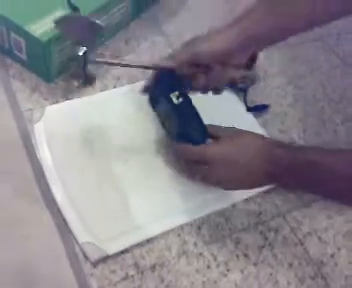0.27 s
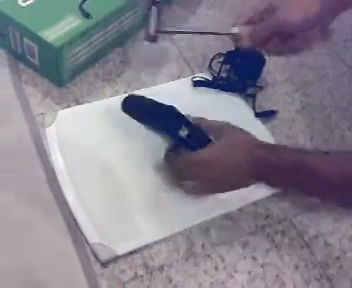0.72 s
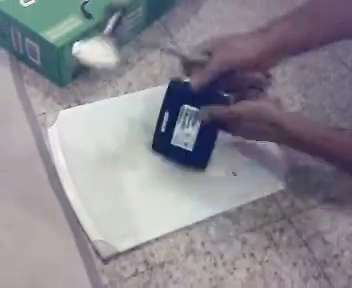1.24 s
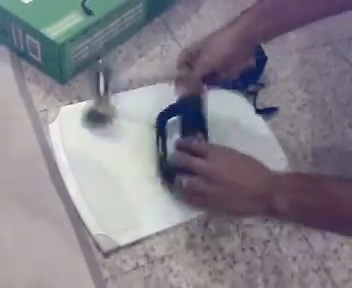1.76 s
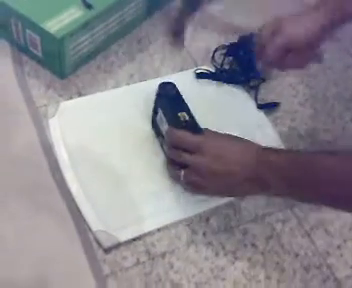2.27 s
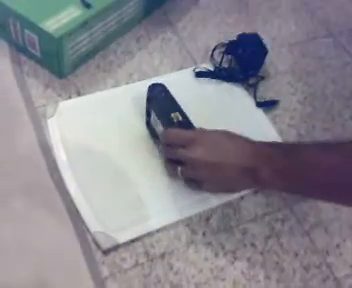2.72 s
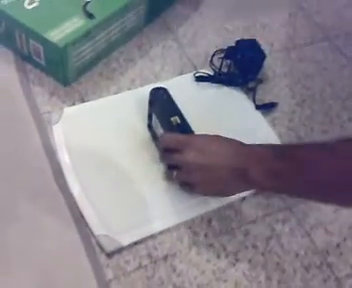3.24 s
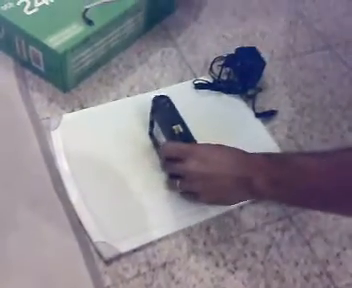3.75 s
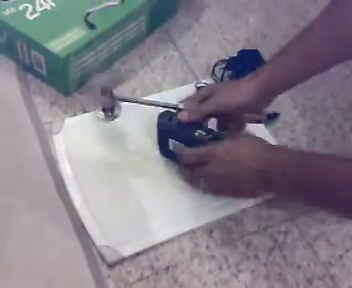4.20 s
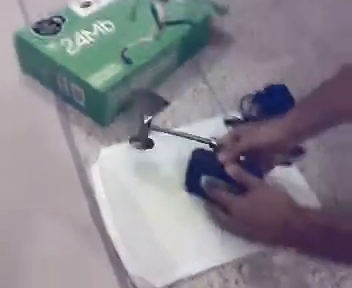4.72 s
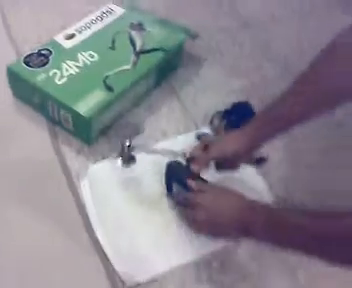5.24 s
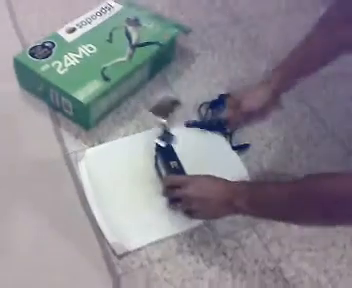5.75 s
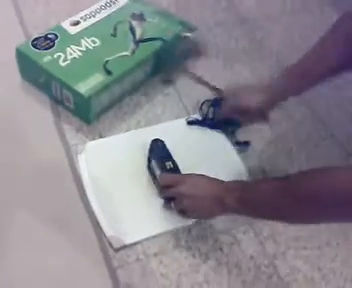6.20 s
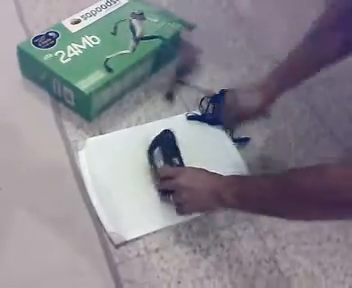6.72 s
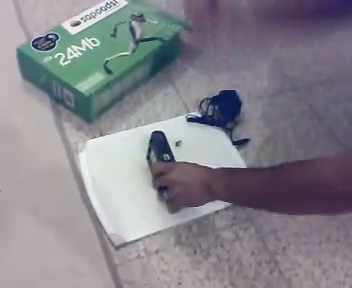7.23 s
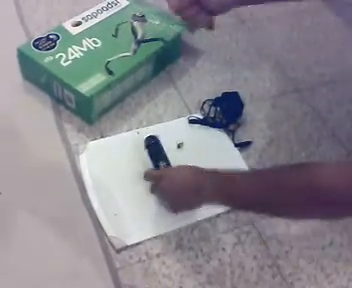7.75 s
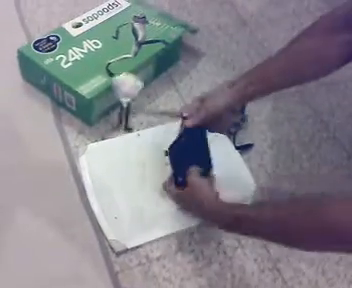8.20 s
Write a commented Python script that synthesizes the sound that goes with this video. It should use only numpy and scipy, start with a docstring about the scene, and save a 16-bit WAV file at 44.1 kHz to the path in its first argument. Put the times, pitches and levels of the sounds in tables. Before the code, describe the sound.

Sharp, overloaded hammer cracks on a hollow plastic device in a bare, reverberant room, with small knocks, scrapes and bits ticking onto the floor.

```python
"""A hammer smashes a plastic modem held on a board on a tiled floor, in a bare, echoing room.
It opens inside a full blow; then the case is turned over, set down and tapped to take aim.
Two blows follow, with a shard's tick between them and a hard clink after; then more handling and taps.
Three last blows, a second shard among them, give way to taps and scrapes over rumble and whine.
Blows, taps and scrapes are flurries of slips exciting resonances; loud ones clip the small microphone."""
import sys
import numpy as np
from scipy import signal
from scipy.fft import rfft, irfft
from scipy.io import wavfile
from scipy.ndimage import uniform_filter1d

SR = 44100
rng = np.random.default_rng(int(sys.argv[2]) if len(sys.argv) > 2 else 0)


def store_pcm(level_fs):
    """Save levels as 16-bit WAV."""
    pcm = np.round(np.clip(level_fs, -1, 1) * 32767).astype(np.int16)
    wavfile.write(sys.argv[1], SR, np.atleast_2d(pcm).T)


N = 373527  # samples
FIR_SIZE = 2048  # samples
HZ = np.fft.rfftfreq(FIR_SIZE, 1 / SR)  # frequency grid of every contact spectrum


def amp(db):
    """Decibels to gain."""
    return 10 ** (np.asarray(db) / 20)


def unit(x):
    """Scales to an energy of one."""
    return x / np.sqrt(np.sum(x ** 2) + 1e-20)


def read(points, hz):
    """Interpolates a table on a log-frequency axis."""
    table_hz, value = np.transpose(points)
    return np.interp(np.log(hz + 1), np.log(table_hz + 1), value)


def add(mix, start_s, sound):
    """Mixes a sound in at start_s, which may lie before zero."""
    start = round(start_s * SR)
    sound = sound[max(-start, 0):]
    part = mix[max(start, 0):][:len(sound)]
    part += sound[:len(part)]


def causal(gain):
    """Minimum-phase impulse response: the quickest with this gain over HZ."""
    log_gain = np.log(np.maximum(gain, 1e-5))
    both_sides = np.r_[log_gain, log_gain[-2:0:-1]]
    return np.fft.ifft(np.exp(np.conj(signal.hilbert(both_sides)))).real


def noise(spectrum):
    """Steady noise of rms one with the given spectrum."""
    bins_hz = np.fft.rfftfreq(N, 1 / SR)
    shaped = rfft(rng.standard_normal(N)) * amp(read(spectrum, bins_hz))
    return unit(irfft(shaped, N)) * np.sqrt(N)


def lowpass(x, hz, size):
    """Steep low-pass without delay."""
    fir = signal.firwin(size, hz, window=("kaiser", 7), fs=SR)
    return signal.oaconvolve(x, fir, "same")


def resonance(hz, width_hz):
    """Gain over HZ of one resonance with steep skirts; width at half gain."""
    detune = (HZ ** 2 - hz ** 2) / ((HZ + 1) * width_hz)
    return 1 / (1 + detune ** 2)


# decay time of the room: (band_hz, t60_s)
ROOM_DECAY = [(100, 0.19), (250, 0.56), (550, 0.5), (1400, 0.57), (3700, 0.47), (7500, 0.42)]


def room(x, wet_db, build_s):
    """Direct sound plus wall echoes that build up and die band by band, drawn anew per call."""
    t = np.arange(SR) / SR
    present = rng.random(SR) < .06 + t  # echoes get denser
    echoes = rng.standard_normal(SR) * present * (1 - np.exp(-t / build_s))
    hz, when_s, bands = signal.stft(echoes, SR, nperseg=256)
    decay = amp(-60 * when_s / read(ROOM_DECAY, hz)[:, None])
    tail = signal.istft(bands * decay, SR, nperseg=256)[1]
    response = amp(wet_db) * unit(tail)
    response[0] += 1
    return signal.fftconvolve(x, response)


# narrow case modes that stand out of every contact: (mode_hz, width_hz, level_db)
CASE_MODES = [(880, 14, -4), (911, 63, -6.5), (1002, 58, 0), (1193, 17, -4.5), (1356, 110, 3.5),
              (1560, 17, -19.5), (1766, 16, -5.5), (1960, 26, -6), (2870, 13, -15), (3250, 33, -6.5)]


def strike(parts, contact_s, slips_per_s, rise_s, hold=1.3):
    """A flurry of tiny slips swells, dies and excites each part: (gain over HZ, level_db in 10 ms)."""
    t = np.arange(4 * FIR_SIZE) / SR
    slips = rng.standard_normal(len(t)) * (rng.random(len(t)) < slips_per_s / SR)
    envelope = (1 - np.exp(-t / rise_s)) * np.exp(-(t / contact_s) ** hold)
    force = unit(slips * envelope)
    # partly whiten: spread in time, little colour of its own
    whitener = causal((np.abs(rfft(force[:])) + 1e-3) ** -.6)
    force = signal.fftconvolve(force, whitener)[:len(t)]
    modes = 1 + sum(amp(db) * resonance(hz, width_hz) for hz, width_hz, db in CASE_MODES)
    sounds = (amp(db) * unit(signal.fftconvolve(force, causal(gain * modes))) for gain, db in parts)
    return np.sqrt(SR / 100) * sum(sounds)


# hammer blows; give 0 = case holds, 1 = buckles:
# (start_s, force_db, give_0_to_1, pitch_hz, ring_width_hz, crack_s)
HAMMER_BLOWS = [(-.115, -6, 0.58, 1580, 1120, 0.013), (3.067, -4, .02, 1875, 602, 0.038),
                (3.5803, -5, 0.16, 1593, 1190, 0.018), (6.4192, -4.5, 0.27, 1575, 1150, 0.016),
                (6.988, -6, 0.6, 1584, 1220, 0.016), (7.5404, -4, 0.81, 1633, 1104, 0.019)]
# spectrum of the floor's dull thud: (freq_hz, level_db)
FLOOR_THUD = [(20, 1.5), (55, -10), (80, -6), (115, 5), (160, -4.5), (300, -24.5), (800, -58.5)]
# spectrum of the broad thump of a blow: (freq_hz, level_db)
BLOW_THUMP = [(60, -21), (160, -7), (270, -3), (440, -7), (620, -0.5), (850, 2), (1100, 2.5), (1350, 8),
              (1700, -9), (3000, -23.5)]
# spectrum of the breaking case: (freq_hz, level_db)
CASE_CRASH = [(500, -19.5), (1800, 2.5), (2400, 2.5), (3100, 0.5), (3650, -1), (4400, 2), (5300, 0),
              (6400, 2), (7200, -1.5), (8500, -9)]
# pairs: (case holds, case buckles); levels against the force
GIVE_THUD_DB, GIVE_CLACK_DB = (-14.5, -22.5), (-18.5, -5.5)
GIVE_CLACK_HZ, GIVE_CLACK_WIDTH_HZ = (2820, 3100), (2100, 260)
BLOW_THUMP_DB, BLOW_SPLINTER_DB = -2, 1  # against the force


def blows():
    """The case cracks under the hammer: floor thud, thump, shell ring, clack and crash, in the room."""
    out = np.zeros(N)
    laws = GIVE_THUD_DB, GIVE_CLACK_DB, GIVE_CLACK_HZ, GIVE_CLACK_WIDTH_HZ
    for start_s, force_db, give, pitch_hz, ring_width_hz, crack_s in HAMMER_BLOWS:
        thud_db, clack_db, clack_hz, clack_width_hz = (np.interp(give, [0, 1], ends) for ends in laws)
        parts = [(amp(read(FLOOR_THUD, HZ)), thud_db),
                 (amp(read(BLOW_THUMP, HZ)), BLOW_THUMP_DB),
                 (resonance(pitch_hz, ring_width_hz), 0),
                 (resonance(clack_hz, clack_width_hz), clack_db),
                 (amp(read(CASE_CRASH, HZ)), BLOW_SPLINTER_DB)]
        blow = strike(parts, crack_s, slips_per_s=5000, rise_s=0.00089)
        add(out, start_s, amp(force_db) * room(blow, wet_db=2, build_s=0.004))
    return out


def case_ring(hz, width_hz, core_db, core_width_hz):
    """A broad resonance of the plastic shell with a narrow core."""
    return resonance(hz, width_hz) + amp(core_db) * resonance(hz, core_width_hz)


# spectrum of the hollow thump of case on board: (freq_hz, level_db)
BOARD_THUMP = [(40, -21), (120, -24.5), (270, -11), (440, -13.5), (650, -5.5), (800, -6), (960, -0.5),
               (1120, -5.5), (1350, -4.5), (1700, -4.5), (3000, -38)]
# spectrum of the bright snap of hard plastic: (freq_hz, level_db)
PLASTIC_SNAP = [(500, -29.5), (1800, -30.5), (2600, -6.5), (3800, -6.5), (4400, 4.5), (5200, 2), (6300, 1),
                (7200, -5.5), (8500, -2.5)]
# pairs: (case in the air, pressed on the board); thump and ring against the strength
SEAT_THUMP_DB, SEAT_RING_DB = (-35, -3), (-7.5, -11)
SEAT_CORE_DB, SEAT_CORE_WIDTH_HZ = (6, 0.5), (70, 260)
CLACK_HZ, CLACK_WIDTH_HZ = 2890, 920  # second shell resonance
LIGHT_CLACK_DB, LIGHT_SNAP_DB = -14, -12  # against the strength


def shell(seat, hz, width_hz):
    """Parts that a light contact excites: a lifted case rings on, a seated one thumps."""
    laws = SEAT_THUMP_DB, SEAT_RING_DB, SEAT_CORE_DB, SEAT_CORE_WIDTH_HZ
    thump_db, ring_db, core_db, core_width_hz = (np.interp(seat, [0, 1], ends) for ends in laws)
    return [(amp(read(BOARD_THUMP, HZ)), thump_db),
            (case_ring(hz, width_hz, core_db, core_width_hz), ring_db),
            (resonance(CLACK_HZ, CLACK_WIDTH_HZ), LIGHT_CLACK_DB),
            (amp(read(PLASTIC_SNAP, HZ)), LIGHT_SNAP_DB)]


# light taps and knocks; seat 0 = in the air, 1 = pressed on the board:
# (start_s, strength_db, seat_0_to_1, pitch_hz)
LIGHT_TAPS = [(0.733, -48, 0.2, 1750), (1.147, -27, 0.47, 1740), (1.1848, -20.5, 0.9, 1830),
              (1.2406, -14.5, 0.57, 1780), (1.3753, -42, 0.87, 1710), (1.4282, -28.5, 0.094, 1816),
              (1.5518, -31.5, 0.12, 1720), (1.5754, -26.5, .05, 1790), (1.624, -25.5, 0.056, 1793),
              (1.707, -35, .4, 1920), (1.8326, -29.5, 0.93, 1570), (1.9186, -23, 0.86, 2120),
              (1.9461, -25.5, 0.82, 2000), (2.1161, -11, 0.94, 1450), (2.6592, -10, 0.66, 1835),
              (4.3074, -22, 1, 1660), (4.3189, -15.5, 0.92, 1560), (5.0291, -32, 0.88, 1893),
              (5.0649, -19, 0.87, 1577), (5.3925, -37.5, 0.82, 1560), (5.9378, -20, 0.63, 1730),
              (7.9841, -19, 0.68, 2080), (8.1938, -40, 0.79, 1940), (8.2538, -38.5, .8, 1910)]
TAP_CONTACT_S = .0078


def taps():
    """Brief, sharp contacts ring the shell without breaking it."""
    out = np.zeros(N)
    for start_s, strength_db, seat, pitch_hz in LIGHT_TAPS:
        parts = shell(seat, pitch_hz, width_hz=630)
        tap = strike(parts, TAP_CONTACT_S, slips_per_s=7600, rise_s=.0005)
        add(out, start_s, amp(strength_db) * room(tap, wet_db=-3.5, build_s=.0014))
    return out


# short scrapes of the shifted case; seat as for taps:
# (start_s, strength_db, seat_0_to_1, contact_s)
CASE_SCRAPES = [(0.976, -58, 0.5, .023), (1.203, -21, .55, 0.015), (1.434, -31, 0, 0.023),
                (1.494, -34, .1, 0.027), (1.582, -39, .05, 0.021), (1.86, -31, .7, 0.038),
                (4.228, -24.5, 0.92, .08), (4.712, -39.5, 1, 0.047), (5.419, -38, .6, 0.023),
                (5.795, -41, 0.82, .023), (5.946, -16, 0.71, .036), (8.353, -38, 0.4, 0.031),
                (8.44, -40, 0.6, 0.035)]
SCRAPE_HZ = 1835  # shell pitch when sliding


def scrapes(swell_share=.6):
    """Slower, sparser slips swell as the case is shifted; a longer slide starts more gently."""
    out = np.zeros(N)
    for start_s, strength_db, seat, contact_s in CASE_SCRAPES:
        parts = shell(seat, SCRAPE_HZ, width_hz=760)
        scrape = strike(parts, contact_s, slips_per_s=2600, rise_s=swell_share * contact_s)
        add(out, start_s, amp(strength_db) * room(scrape, wet_db=-4.5, build_s=.0014))
    return out


# ringing modes of the clink: (mode_hz, relative_level_db, t60_s)
CLINK_MODES = [(590, -10, 0.17), (735, -5.5, 0.27), (1090, -12, .07), (1340, -8, 0.05), (4100, -1, .05),
               (4140, 1, .04), (4700, -3, .07), (4740, 1, .07), (4840, -6, .06), (6270, -5, .05),
               (6270, 0, 0.043), (6360, -3, .05)]


def clink(start_s, level_db):
    """A hard click with briefly ringing modes, low and high."""
    t = np.arange(SR // 3) / SR
    ring = sum(amp(db - 60 * t / t60_s) * np.sin(2 * np.pi * hz * t) for hz, db, t60_s in CLINK_MODES)
    parts = [(amp(read(BLOW_THUMP, HZ)), 4.5), (amp(read(CASE_CRASH, HZ)), 4.5)]
    add(ring, 0, strike(parts, 0.02, slips_per_s=4000, rise_s=0.00033))
    out = np.zeros(N)
    add(out, start_s, room(amp(level_db) * ring, wet_db=1.5, build_s=.004))
    return out


# broken bits landing on the tiles: (start_s, level_db)
SHARD_TICKS = [(3.467, -41.5), (7.134, -32)]


def shards():
    """A splinter lands on the floor with a thin, bright tick: the plastic snap alone."""
    out = np.zeros(N)
    for start_s, level_db in SHARD_TICKS:
        parts = [(amp(read(PLASTIC_SNAP, HZ)), level_db)]
        tick = strike(parts, 0.0067, slips_per_s=2300, rise_s=.001)
        add(out, start_s, room(tick, wet_db=-3.0, build_s=.002))
    return out


# hands and case sliding, Gaussian swells: (centre_s, half_length_s, level_db before grain)
SLIDING = [(0.99, 0.034, -56), (1.602, 0.29, -53.5), (2.546, 0.39, -54.5), (3, 0.3, -49), (4.606, .23, -53),
           (5.465, .1, -55.5), (5.717, 0.1, -52), (6.31, 0.99, -52)]
# spectrum of the rub: (freq_hz, relative_level_db)
RUB = [(30, 3), (90, 1.5), (280, 4), (500, -2.0), (900, -0.5), (1400, -3.0), (1850, -1.5),
       (2300, -7), (3200, -13), (4200, -16), (7000, -19.5)]


def shuffles():
    """Soft friction of hands and plastic on the board: noise with a random, grainy level."""
    t = np.arange(N) / SR
    swell = sum(amp(db) * np.exp(-((t - centre_s) / half_s) ** 2) for centre_s, half_s, db in SLIDING)
    grain = unit(uniform_filter1d(rng.standard_normal(N), size=500)) * np.sqrt(N)
    grain_db = 1.1 * grain
    return swell * amp(grain_db) * noise(RUB)


# spectrum of the room rumble: (freq_hz, relative_level_db)
RUMBLE = [(20, -21), (50, -9), (70, -6), (120, -10), (200, -13.5), (290, -8), (420, -15), (600, -16),
          (1100, -23), (1750, -16.5), (2400, -26), (3200, -32.5), (5000, -30.5), (7500, -34.5)]
RUMBLE_RMS_DB = -56.5
# faint hum and electronic tones: (tone_hz, rms_db)
WHINE_TONES = [(88, -67.5), (3225, -75), (3515, -74), (5276, -76.5)]


def hush():
    """Steady shaped noise as room rumble, with sine tones as hum and thin electronic whine."""
    t = np.arange(N) / SR
    whine = sum(amp(db) * np.sqrt(2) * np.sin(2 * np.pi * hz * t) for hz, db in WHINE_TONES)
    return amp(RUMBLE_RMS_DB) * noise(RUMBLE) + whine


def scene():
    """Everything at one microphone."""
    handling = taps() + scrapes() + shuffles()
    debris = clink(start_s=3.9685, level_db=-32.5) + shards()
    return (blows() + handling + debris + hush())[None]


INPUT_BAND_HZ, OVERLOAD_BAND_HZ, EDGE_HZ = 7950, 7550, 16100


def record(dry, input_db=-4.0, output_db=-4.0):
    """The narrow-band input clips; its filter's overshoot clips again and leaves a faint fizz."""
    narrow = lowpass(dry[0], INPUT_BAND_HZ, size=201)
    clipped = np.clip(narrow, -amp(input_db), amp(input_db))
    overloaded = lowpass(clipped, OVERLOAD_BAND_HZ, size=161)
    clipped_again = np.clip(overloaded, -amp(output_db), amp(output_db))
    return lowpass(clipped_again, EDGE_HZ, size=301)[None]


dry = scene()
out = record(dry)
store_pcm(out)
```